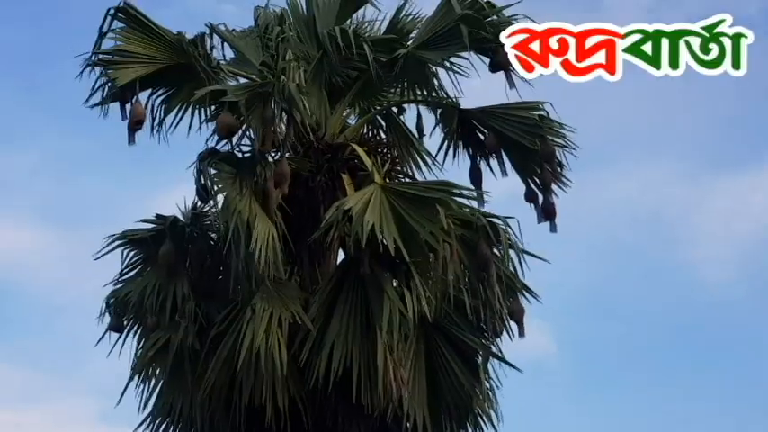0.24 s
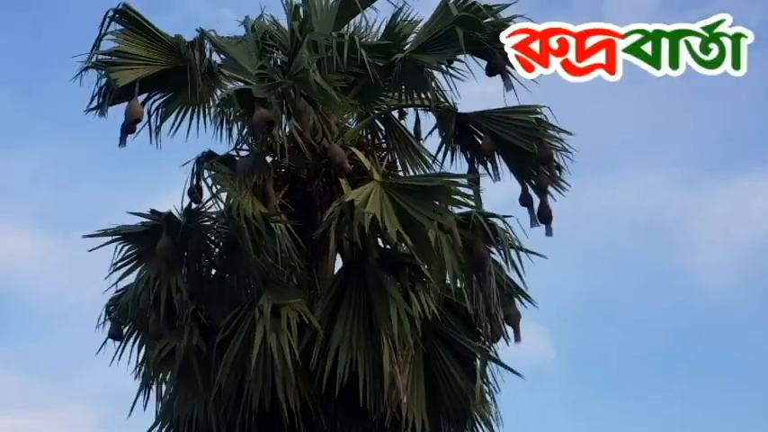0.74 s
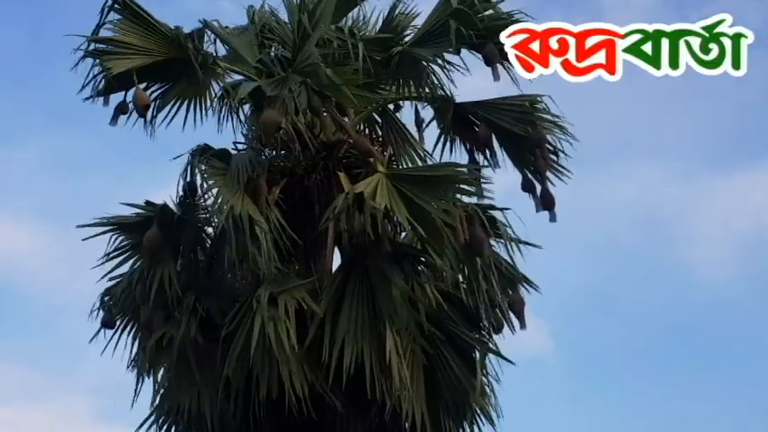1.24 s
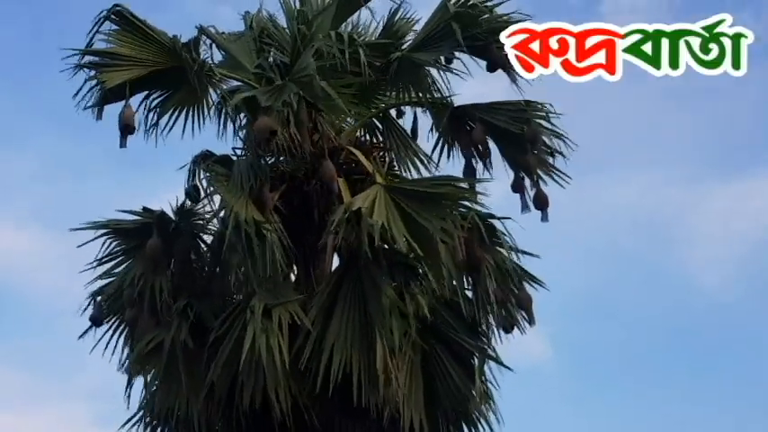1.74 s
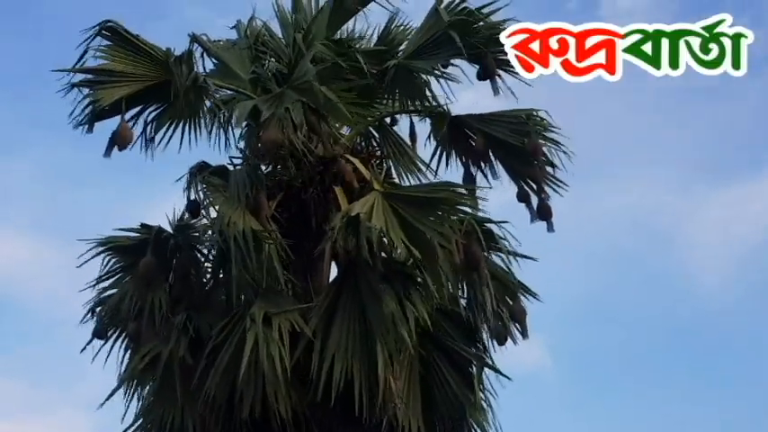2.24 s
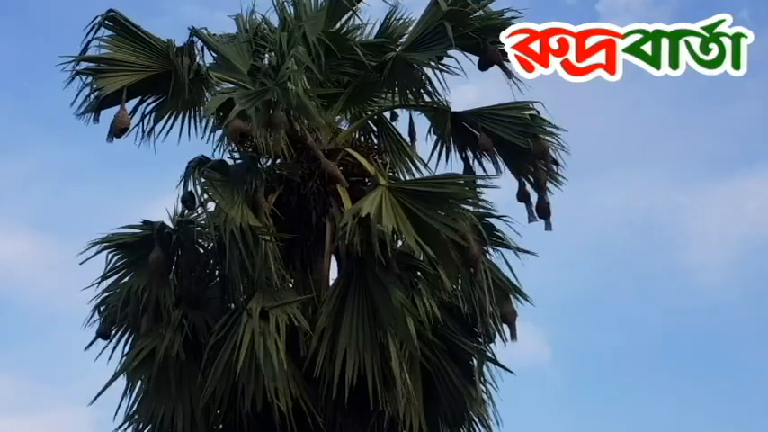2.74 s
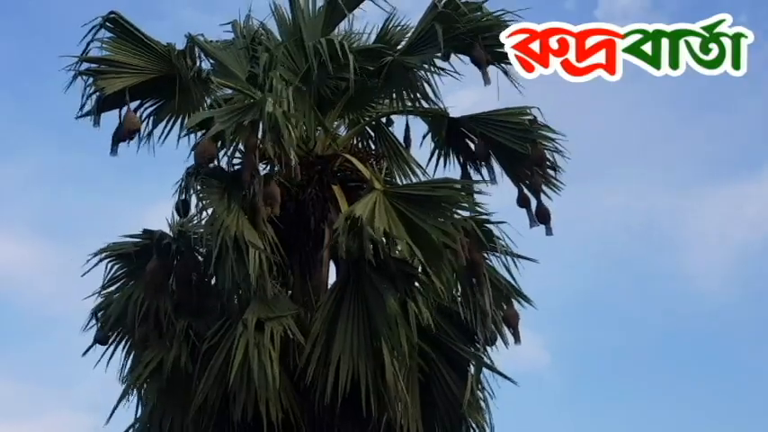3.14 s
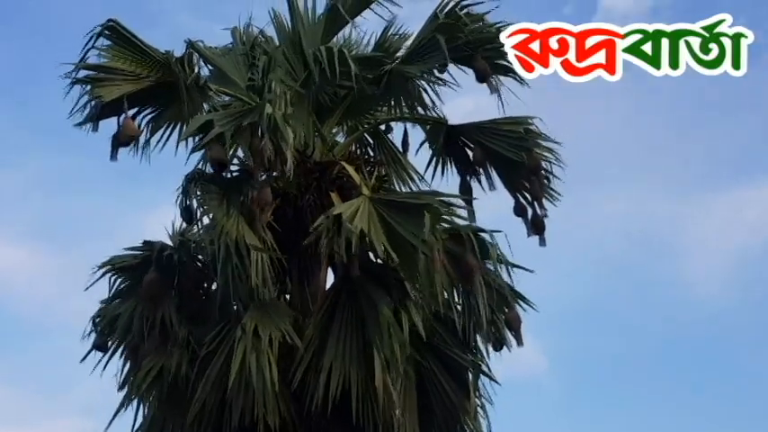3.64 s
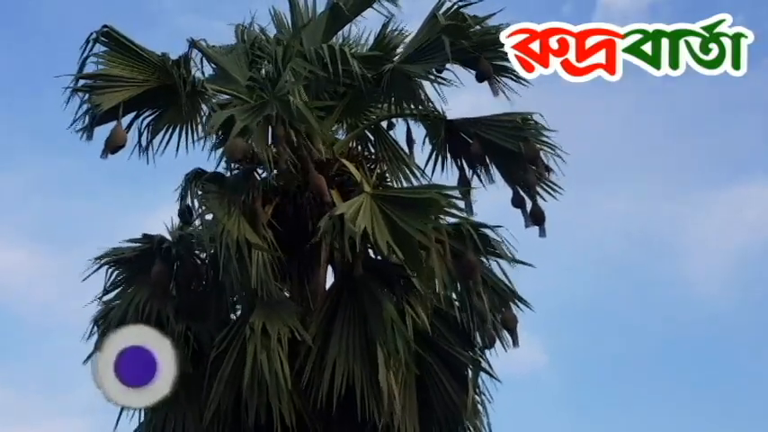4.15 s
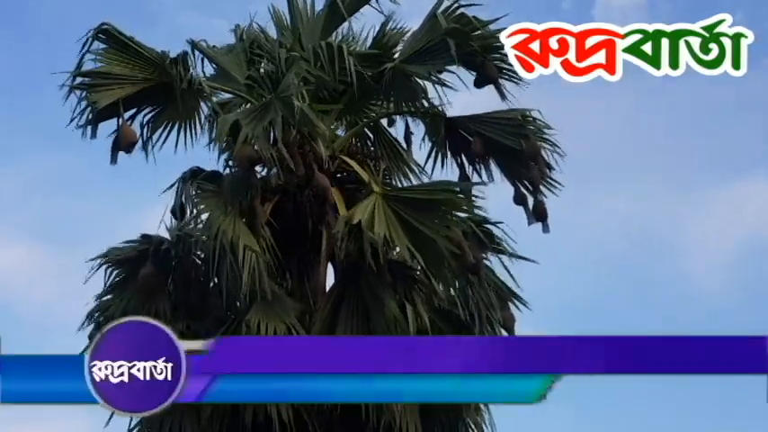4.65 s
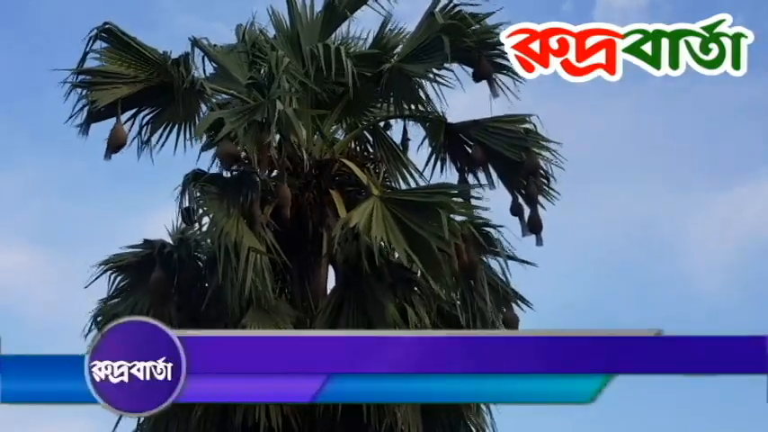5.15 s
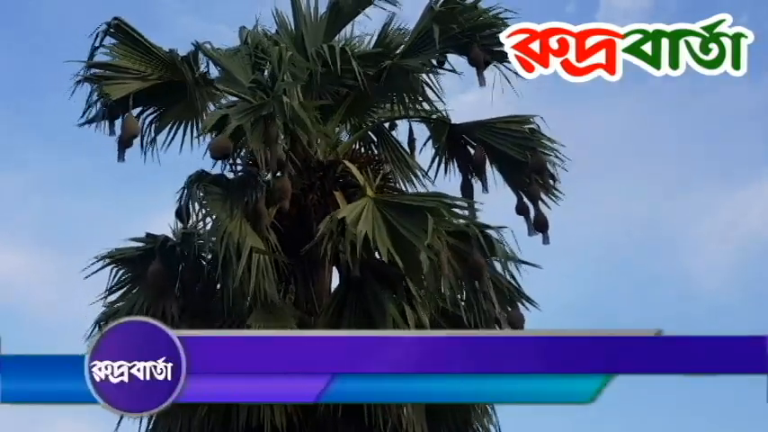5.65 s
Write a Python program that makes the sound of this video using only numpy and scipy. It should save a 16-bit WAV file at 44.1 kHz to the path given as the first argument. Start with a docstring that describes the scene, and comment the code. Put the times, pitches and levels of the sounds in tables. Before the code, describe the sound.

Weaver birds chatter in a palm crown with warbled cheeps, pips and dry rasps, over insect shrilling, early wind buffets and a distant engine rumble.

```python
"""Throughout, weaver birds chatter in a palm crown: runs of warbled cheeps that others join, pips and hissing rasps.
Until about 1.7 s wind buffets the microphone; then one of two insects drops in level, returning near 3 s.
A lower-voiced bird slurs and gurgles, and late on whistles and gives three arched calls; far birds whistle behind.
A distant engine rumbles under it all. Calls are wavering tones; rasps, wind and air are coloured noise."""
import sys
import numpy as np
from scipy import signal
from scipy.fft import rfft, irfft, next_fast_len
from scipy.io import wavfile
from scipy.ndimage import uniform_filter1d

SR = 44100
rng = np.random.default_rng(int(sys.argv[2]) if len(sys.argv) > 2 else 0)


def transcribe(u):
    """Save the signal u as a 16-bit wav file named by the first command-line argument.

    u: samples, shape (n,) or (channels, n), limited to [-1, 1]; the rate is SR.
    q: integer samples, one column per channel.
    """
    v = np.clip(np.atleast_2d(u).T, -1, 1)
    q = np.round(v * 32767).astype(np.int16)
    wavfile.write(sys.argv[1], SR, q)


N = 260631
TIME = np.arange(N) / SR

# Bouts of cheeps, which near and deeper weavers share.
# Each row: start in seconds, length in seconds, middle pitch before warbling in Hz, base level in dB.
CHEEP_BOUTS = [(0.094, 0.088, 5900, -38), (0.188, 0.25, 4550, -27), (0.408, .14, 4510, -30.5),
               (0.625, 0.074, 4910, -28.5), (0.756, 0.055, 5430, -32), (0.959, 0.18, 4645, -25.5),
               (1.255, 0.067, 4850, -26.5), (1.367, 0.052, 4360, -37), (1.523, 0.11, 5080, -25.5),
               (1.651, 0.088, 4510, -30.5), (1.772, .152, 4670, -26.3), (2.167, .11, 6300, -41),
               (2.292, 0.24, 4840, -27.5), (2.665, 0.054, 4840, -28), (2.96, 0.16, 5250, -36.5),
               (3.102, .07, 4760, -27.5), (3.248, .165, 4890, -35), (3.46, .135, 4936, -26),
               (3.814, 0.084, 4835, -28), (3.951, .098, 4980, -30), (4.21, 0.27, 4527, -30.5),
               (4.7, 0.17, 4956, -25.5), (4.902, 0.057, 4290, -33), (5.06, .078, 4050, -27),
               (5.146, 0.12, 4613, -30.5), (5.425, 0.19, 4760, -27), (5.866, 0.056, 4160, -26)]
# samples by which birds in the crown, and birds beside it, reach the left microphone sooner
PALM_LAG, ASIDE_LAG = 6, 2
PIP_S = 0.038  # length of a pip in seconds


def gain_of(db):
    """Turns decibels into an amplitude factor."""
    return 10 ** (np.asarray(db) / 20)


def evened(x):
    """Scales a signal to an rms (average strength) of 1."""
    return x / np.sqrt(np.mean(x ** 2) + 1e-20)


def read(points, hz):
    """Reads a curve between its points, spaced by the logarithm of frequency."""
    f, value = np.transpose(points)
    return np.interp(np.log(hz + 1), np.log(f + 1), value)


def level(rows):
    """Draws a gain over the whole scene from rows of seconds and dB."""
    return gain_of(np.interp(TIME, *np.transpose(rows)))


def sides(left_db):
    """Gives left and right gains of equal total power for a level difference in dB."""
    return evened(gain_of([[left_db / 2], [-left_db / 2]]))


def add(mix, s, sound):
    """Adds a stereo sound at s seconds, cutting whatever falls outside the scene."""
    at = round(s * SR)
    sound = sound[:, max(-at, 0):]
    part = mix[:, max(at, 0):][:, :sound.shape[1]]
    part += sound[:, :part.shape[1]]


def wander(length, hz):
    """Makes a smooth random curve of rms 1 that changes about hz times a second."""
    size = next_fast_len(length, True)
    white = rfft(rng.standard_normal(size))
    slow = white / (1 + (np.fft.rfftfreq(size, 1 / SR) / hz) ** 4)
    return evened(irfft(slow, size)[:length])


def noise(colour):
    """Makes stereo noise of a given colour, most alike in the two channels in the bass."""
    # Likeness of left and right. Each row: frequency in Hz, likeness from 0 to 1.
    likeness = [(60, 0.97), (290, 0.9), (640, 0.61), (1400, 0.0092), (16000, 0.21)]
    hz = np.fft.rfftfreq(N, 1 / SR)
    left, other = rfft(rng.standard_normal((2, N)))
    same = np.clip(read(likeness, hz), -1, 1)
    right = same * left + np.sqrt(1 - same ** 2) * other
    return evened(irfft(np.array([left, right]) * gain_of(read(colour, hz)), N))


def swell(s, length):
    """Shapes a rounded burst that starts at s seconds."""
    progress = np.clip((TIME - s) / length, 0, 1)
    return np.sqrt(np.maximum(np.sin(np.pi * progress), 0))


def swell_in(sound, rise_s):
    """Lets a call open gradually over rise_s seconds."""
    return sound * np.minimum(np.arange(sound.shape[1]) / SR / rise_s, 1)


def echoes(t60, delay):
    """Makes a dying spray of reflections of energy 1 a channel, falling 60 dB in t60 seconds."""
    t = np.arange(int((t60 + delay) * SR) + 2) / SR
    taps = rng.standard_normal((len(t), 2)).T * gain_of(-60 * t / t60) * (t > delay)
    return taps / np.linalg.norm(taps, axis=1, keepdims=True)


def sing(hz, db, overtones_db, scattered, jitter, flutter=0.24, lag=PALM_LAG, fronds_t60=0.14, third_db=-7):
    """Sings a wavering tone with overtones, heard directly and scattered by the fronds."""
    count = len(hz)
    phase = 2 * np.pi * np.cumsum(hz * (1 + jitter * wander(count, 560))) / SR
    # overtones too high for the sample rate are left out
    second = np.sin(2 * phase) * (2 * hz < SR / 2)
    third = np.sin(3 * phase) * (3 * hz < SR / 2)
    tone = np.sin(phase) + gain_of(overtones_db) * (second + gain_of(third_db) * third)
    tone = tone * np.exp(flutter * wander(count, 270))
    tone = evened(tone * signal.windows.tukey(count, .3))
    paths = np.sqrt(scattered) * echoes(fronds_t60, 0.0012)
    paths[[0, 1], [0, lag]] += np.sqrt(1 - scattered)  # the direct sound, later on the right
    heard = signal.fftconvolve(tone[None], paths, axes=1)
    heard *= np.linalg.norm(tone) / np.linalg.norm(heard, axis=1, keepdims=True)
    return gain_of(db) * heard


def note(hz, db, overtones_db, scattered, flutter=.55, jitter=0.034):
    """Sings from beside the palm: birds on open perches sound clean, hidden ones waver."""
    return sing(hz, db, overtones_db, scattered, jitter * scattered, flutter * scattered, lag=ASIDE_LAG)


def contour(shape, length, top_hz):
    """Draws the pitch of a note that follows one of the named shapes, with its corners rounded."""
    # Pitch shapes by name. Each row: share of the note's length, factor on the given pitch.
    shapes = { "pip": [(0, 1), (.3, 0.98), (.65, 0.98), (1, 0.85)], "slur": [(0, 0.96), (.45, .88),
              (1, .81)], "dip": [(0, 1), (.3, .82), (.65, .78), (1, .93)], "twin": [(0, .8), (.2, 0.99),
              (.38, .8), (.58, .72), (.78, 0.96), (1, .66)], "arch": [(0, 0.37), (.28, .6), (.42, 0.87),
              (.52, 0.98), (.64, .94), (.77, 0.6), (1, 0.614)], "bow": [(0, .88), (.5, 0.96), (1, .91)],
              "level": [(0, 0.96), (1, 1)], "plunge": [(0, 1), (1, .55)], }
    pitch = np.interp(np.linspace(0, 1, int(length * SR)), *np.transpose(shapes[shape]))
    return top_hz * uniform_filter1d(pitch, size=200, mode="nearest")


def warble(length, top_hz, fall, rate, depth, last_drop=0.138):
    """Draws a cheep's pitch: it rises to a first peak, swings while it sinks, and ends in a quick drop."""
    t = np.arange(int(length * SR)) / SR
    swing = abs(np.sin(np.pi * (rate * t - .3))) ** 1.5
    sinking = 1 - fall * t / length - last_drop * (t / length) ** 7
    return top_hz * (1 - depth * swing) * sinking


def weavers(cheep_db=1.0, pip_db=4.5, depth=.21):
    """The nearest weavers sing each bout as an even run of warbled cheeps.

    High pips that hold nearly level, then fall, ring out above."""
    # High pips, falling at the end. Each row: start in seconds, top pitch in Hz, level in dB before pip_db.
    pips = [(.345, 5880, -32), (.674, 5790, -34), (1.009, 5800, -32), (1.438, 5660, -31.5),
            (1.883, 5766, -29.5), (2.48, 5500, -37), (3.219, 5314, -31), (3.978, 5370, -26.5),
            (4.511, 5530, -30.5), (5.195, 5260, -28.5), (5.403, 5560, -39)]
    every_s, sung_share = .072, .97  # rough time from cheep to cheep, and the share of it that is sung
    pitch_spread, level_spread_db = 0.03026, 0.8
    warbles_per_s, warble_spread = 34, 0.285  # the spreads of pitch and warbling are shares
    out = np.zeros((2, N))
    for start, span, middle_hz, db in CHEEP_BOUTS:
        count = max(round(span / every_s), 1)
        step = span / count
        for k, (high, quick, loud) in enumerate(rng.uniform(-1.012, 1, (count, 3))):
            top_hz = middle_hz * (1 + pitch_spread * high)
            rate = warbles_per_s * (1 + warble_spread * quick)
            hz = warble(step * sung_share, top_hz, fall=.085, rate=rate, depth=depth)
            call_db = db + cheep_db + level_spread_db * loud
            cheep = sing(hz, call_db, overtones_db=-21, scattered=.5, jitter=.022)
            add(out, start + k * step, swell_in(cheep, rise_s=0.013))
    for s, top_hz, db in pips:
        hz = contour("pip", PIP_S, top_hz)
        add(out, s, sing(hz, db + pip_db, overtones_db=-25, scattered=0.65, jitter=0.019))
    return out * sides(left_db=-2.0)


def colony(count=150, db=-38.5, spread_db=3, answer_s=.015, idle_db=-4, low_hz=3950, high_hz=5600):
    """Fainter weavers deep in the crown warble: half join in with a near bout, the rest call at random."""
    out = np.zeros((2, N))
    for k, (when, size, high, quick, loud) in enumerate(rng.random((count, 5))):
        start, span = CHEEP_BOUTS[k % len(CHEEP_BOUTS)][:2]
        call_db = db + spread_db * (2 * loud - 1)
        if k < count / 2:
            s = start + answer_s + (span - 2 * answer_s) * when
        else:
            s = (2 * (k + when) / count - 1) * N / SR
            call_db += idle_db
        top_hz = low_hz + (high_hz - low_hz) * high
        hz = warble(0.044 + .04 * size, top_hz, fall=.1, rate=25 + 30 * quick, depth=0.25)
        add(out, s, sing(hz, call_db, overtones_db=-39, scattered=0.83, jitter=0.021))
    return out


def far_pips(count=26, db=-43, spread_db=3, low_hz=5250, high_hz=6350):
    """Faint pips from the back of the crown are scattered through the chatter."""
    out = np.zeros((2, N))
    for k, (when, high, loud) in enumerate(rng.random((count, 3))):
        hz = contour("pip", PIP_S, low_hz + (high_hz - low_hz) * high)
        pip_db = db + spread_db * (2 * loud - 1)
        pip = sing(hz, pip_db, overtones_db=-30, scattered=0.55, jitter=0.019)
        add(out, (k + when) / count * N / SR, pip)
    return out


def rasps(grain=0.075):
    """Short dry hisses among the calls are bursts of coloured noise with a grainy level."""
    # Rasps. Each row: start in seconds, base level in dB.
    rasp_rows = [(1.033, -26.5), (1.255, -32), (1.495, -29.5), (1.73, -34.5), (3.467, -34.5), (4.3, -34),
                 (4.519, -28), (4.783, -31), (5.018, -34.5), (5.205, -34), (5.468, -26), (5.705, -32)]
    # Colour of the hiss. Each row: frequency in Hz, relative level in dB.
    rasp_colour = [(1500, -13), (3000, -3), (5000, 6.5), (7500, 1.5), (10500, 2), (12500, -5), (15500, -10)]
    strength = sum(gain_of(db) * swell(s, length=.102) for s, db in rasp_rows)
    grains = evened(np.exp(grain * wander(N, 320)))
    return noise(rasp_colour) * strength * grains * sides(left_db=-2.5)


def low_bird(low_whistle_db=-4.5, plunge_db=-0.5, low_arch_db=-1.0):
    """The lower-voiced bird slurs, gurgles, whistles and gives arched calls.

    Its whistle and arched calls have a strong second harmonic over a voice an octave lower."""
    # Falling slurs. Each row: start in seconds, length in seconds, pitch before shaping in Hz, level in dB.
    slurs = [(1.628, 0.054, 1990, -46.5), (4.727, 0.053, 2414, -40), (4.872, .055, 2156, -45)]
    # Second harmonic of the arched calls. Each row: start in seconds, pitch before shaping in Hz, level in dB.
    arches = [(5.578, 4250, -32), (5.69, 4400, -31), (5.806, 4465, -31)]
    out = np.zeros((2, N))
    gurgle = warble(.26, 2700, fall=0.024, rate=18, depth=.23, last_drop=0.0796)
    gurgle = gurgle * (1 + 0.047 * wander(len(gurgle), 67))
    add(out, 2.85, note(gurgle, db=-37, overtones_db=-14, scattered=0.85))
    for s, length, top_hz, db in slurs:
        add(out, s, note(contour("slur", length, top_hz), db, overtones_db=-12, scattered=0.29))

    # the nearly level whistle: its strong second harmonic, the voice an octave lower, then a plunge
    whistle_at_s, whistle_s, whistle_hz, whistle_db = 5.329, .082, 3450, -35.5
    whistle = contour("level", whistle_s, whistle_hz)
    plunge = contour("plunge", .024, whistle_hz * .86)
    add(out, whistle_at_s, note(whistle, whistle_db, overtones_db=-31, scattered=0.076))
    low_whistle = note(whistle / 2, whistle_db + low_whistle_db, overtones_db=-20, scattered=0.65)
    add(out, whistle_at_s, low_whistle)
    plunge_call = note(plunge, whistle_db + plunge_db, overtones_db=-19, scattered=.3)
    add(out, whistle_at_s + whistle_s - .006, plunge_call)

    # in each arched call the voice roughly an octave lower is heard at the crest
    arch_s, crest_from, crest_share = .068, 0.27, 0.49  # the last two are shares of the call's length
    for s, top_hz, db in arches:
        crest = contour("bow", crest_share * arch_s, top_hz / 2)
        add(out, s, note(contour("arch", arch_s, top_hz), db, overtones_db=-22, scattered=0.53))
        low_arch = note(crest, db + low_arch_db, overtones_db=-3.5, scattered=.2)
        add(out, s + crest_from * arch_s, low_arch)
    return out


def other_birds():
    """Clean chirps with two pitch peaks come from an open perch; thin squeaks lie far above the chatter."""
    # Chirps. Each row: start in seconds, pitch before shaping in Hz, base level in dB.
    chirps = [(0.052, 4800, -32), (2.065, 5100, -36.5), (2.896, 5040, -33)]
    # Squeaks. Each row: start in seconds, top pitch in Hz.
    squeaks = [(.848, 9900), (2.689, 10460), (3.022, 9970), (3.445, 10080), (4.878, 10300)]
    out = np.zeros((2, N))
    for s, top_hz, db in chirps:
        add(out, s, note(contour("twin", 0.08, top_hz), db, overtones_db=-10, scattered=0.18))
    for s, top_hz in squeaks:
        add(out, s, note(contour("dip", 0.036, top_hz), db=-36, overtones_db=-30, scattered=0.45))
    return out * sides(left_db=-0.5)


def far_birds(count=16, faint_db=-53.0, faint_s=0.158, low_hz=1700, high_hz=2180):
    """Soft whistles from far away bow up and down in pitch; fainter, nearly level ones come at random."""
    # Far whistles. Each row: start in seconds, length in seconds, pitch before shaping in Hz, level in dB.
    far_whistles = [(.24, 0.15, 1950, -56), (.707, .12, 1854, -44), (1.68, .14, 1452, -53),
                    (3.473, 0.099, 1867, -44), (4.406, .12, 1475, -45.5)]
    out = np.zeros((2, N))
    for s, length, top_hz, db in far_whistles:
        add(out, s, note(contour("bow", length, top_hz), db, overtones_db=-17, scattered=0.72))
    for when, high in rng.random((count, 2)):
        hz = contour("level", faint_s, low_hz + (high_hz - low_hz) * high ** 2)
        add(out, when * N / SR, note(hz, faint_db, overtones_db=-40, scattered=0.67))
    return out


def buzzing_insect(db=-38.3, between=0.1, sharpness=3.2, tonal=.7, sweep_top_hz=11350, sweep_fall_hz=1150):
    """One insect buzzes in even pulses, each a tiny falling sweep mixed with noise."""
    # Colour of the buzz's noise. Each row: frequency in Hz, relative level in dB.
    buzz_colour = [(8000, -28.5), (9600, -17), (10300, -9), (10750, -2), (11200, -9.5), (11800, -21),
                   (13500, -25)]
    pulse_hz = 122.7 * (1 + 0.0029 * wander(N, 2.9))
    turns = np.cumsum(pulse_hz) / SR
    pulses = evened(between + np.exp(sharpness * (np.cos(2 * np.pi * turns) - 1)))
    sweep_hz = sweep_top_hz - sweep_fall_hz * (1 + np.sin(2 * np.pi * turns)) / 2
    drift = 3 * np.array([wander(N, 60), wander(N, 60)])  # phase drifts apart in the two channels
    sweeps = evened(np.sin(2 * np.pi * np.cumsum(sweep_hz) / SR + drift))
    carrier = np.sqrt(tonal) * sweeps + np.sqrt(1 - tonal) * noise(buzz_colour)
    return gain_of(db) * carrier * pulses * sides(left_db=0.5)


def shrilling_insect(db=-34.2, pause_from_s=1.69, pause_to_s=2.98, pause_db=-10.5, pause_edge_s=.03):
    """Another insect shrills on the left as flickering noise; during its pause the same shrill drops by about
    10.5 dB."""
    # Colour of the shrill. Each row: frequency in Hz, relative level in dB.
    shrill_colour = [(7500, -21), (8800, 0.5), (9900, 8), (10600, 8.5), (11300, 6), (11800, -7.5),
                     (13000, -9), (16000, -18)]
    inside_s = np.minimum(TIME - pause_from_s, pause_to_s - TIME)
    paused = np.clip(inside_s / pause_edge_s, 0, 1)
    flicker = gain_of(0.79 * wander(N, 10.4))
    return gain_of(db + pause_db * paused) * noise(shrill_colour) * flicker * sides(left_db=18)


def wind(eddy_db=3.0, eddy_hz=9, hard_db=-10, hard_shift=1.35):
    """Eddies hit each microphone port separately; the strongest sound higher and overload it softly."""
    # Strongest puffs. Each row: start in seconds, length in seconds, left and right strength in dB.
    puffs = [(0.279, 0.03, -12.5, -27), (.627, 0.088, -17.5, -42), (0.755, 0.024, -15.5, -38),
             (1.25, 0.084, -38, -23.5), (1.318, 0.05, -20, -39), (1.414, .07, -33, -8.5),
             (1.575, .132, -38, -11)]
    # Colour of the gentler wind. Each row: frequency in Hz, relative level in dB.
    puff_colour = [(20, -16), (45, 2), (80, 7.5), (160, -5.5), (300, -16), (600, -33.5), (1500, -61),
                   (5000, -78)]
    # Breeze between the puffs, until it drops. Each row: time in seconds, base level in dB.
    breeze_rows = [(0, -30.5), (.35, -35.5), (.52, -22.5), (.88, -39.5), (1.27, -25.5), (1.68, -21.5),
                   (1.72, -43)]
    eddies = gain_of(eddy_db * np.array([wander(N, eddy_hz), wander(N, eddy_hz)]))
    strength = level(breeze_rows) * eddies * sides(left_db=-6.5)
    for s, length, left_db, right_db in puffs:
        strength = strength + gain_of([[left_db], [right_db]]) * swell(s, length)
    hard = np.clip(strength / gain_of(hard_db), 0, 1) ** 2
    hard_colour = [(hz * hard_shift, db) for hz, db in puff_colour]
    soft_noise = np.array([noise(puff_colour)[0], noise(puff_colour)[0]])  # separate in each channel
    pressure = strength * (np.sqrt(1 - hard) * soft_noise + np.sqrt(hard) * noise(hard_colour))
    return .85 * np.tanh(pressure / .85)


def distant_engine(rumble_db=-1.03, hum_db=-7):
    """A distant engine rumbles as low noise, with a wavering hum at its firing rate."""
    # Colour of the rumble. Each row: frequency in Hz, relative level in dB.
    rumble_colour = [(20, -25), (52, -6), (65, -3), (78, -6), (140, -13.5), (220, -24.5), (450, -31.5),
                     (1500, -49)]
    # Strength of the engine. Each row: time in seconds, base level in dB.
    rumble_rows = [(0, -28.5), (2.4, -35.5), (3.5, -34.5), (4.6, -29.5), (5.2, -35), (5.9, -32)]
    hum_hz = 65.3 * (1 + .022 * wander(N, 2.72))
    hum = evened(np.sin(2 * np.pi * np.cumsum(hum_hz) / SR))
    return level(rumble_rows) * (gain_of(rumble_db) * noise(rumble_colour) + gain_of(hum_db) * hum)


def open_air(air_db=-0.45):
    """The soft wash of open air is coloured noise whose level wavers a little."""
    # Colour of the wash. Each row: frequency in Hz, relative level in dB.
    air_colour = [(300, 3), (600, -1), (1200, -3), (1800, 0), (2500, -1), (4500, 1.5), (7000, -7.5),
                  (12000, -29), (15500, -29)]
    # Strength of the wash. Each row: time in seconds, base level in dB.
    air_rows = [(0, -35.5), (1.6, -34.5), (2.1, -42), (3.0, -37.5), (4.5, -34.5), (5.9, -35.5)]
    return level(air_rows) * noise(air_colour) * gain_of(air_db + .5 * wander(N, 16))


def scene(trees_db=-11):
    """Sets the birds, with a faint echo from the trees around, over insects, wind, engine and air."""
    birds = weavers() + colony() + far_pips() + rasps() + low_bird() + other_birds() + far_birds()
    trees = signal.fftconvolve(birds, echoes(t60=0.14, delay=0.026), axes=1)[:, :N]
    insects = buzzing_insect() + shrilling_insect()
    return birds + gain_of(trees_db) * trees + insects + wind() + distant_engine() + open_air()


def record(dry):
    """The recorder's band limit removes the treble above about 15900 Hz."""
    low_pass = signal.firwin(511, 15900, window=("kaiser", 9), fs=SR)
    return signal.oaconvolve(dry, low_pass[None], "same", axes=1)


dry = scene()
out = record(dry)
transcribe(out)
```